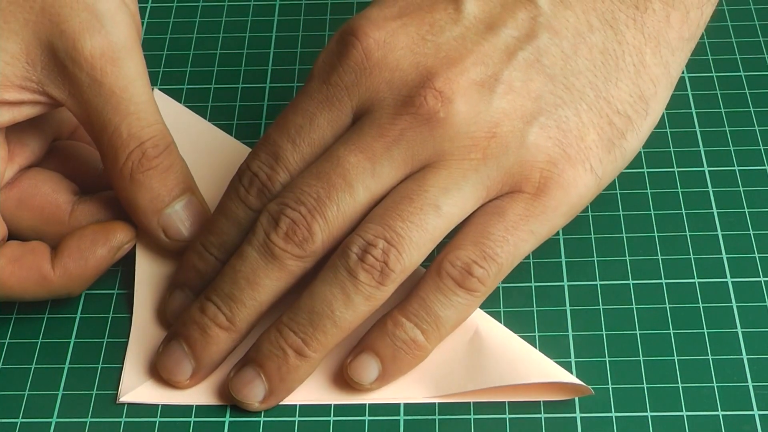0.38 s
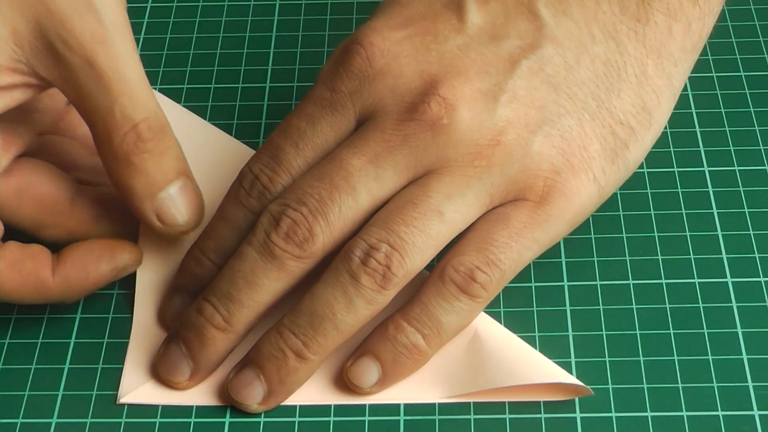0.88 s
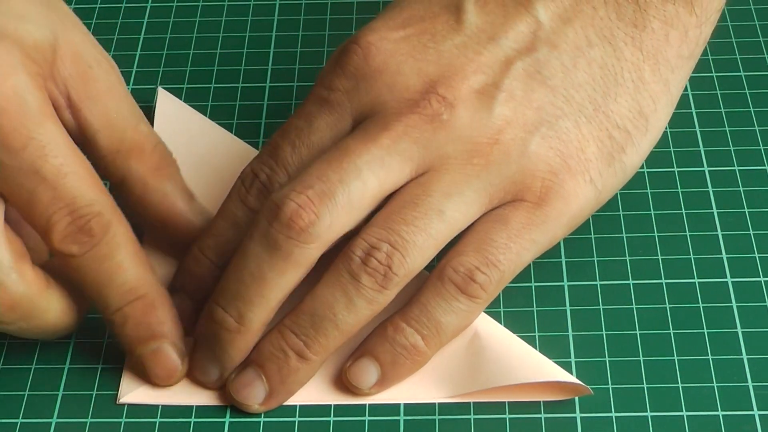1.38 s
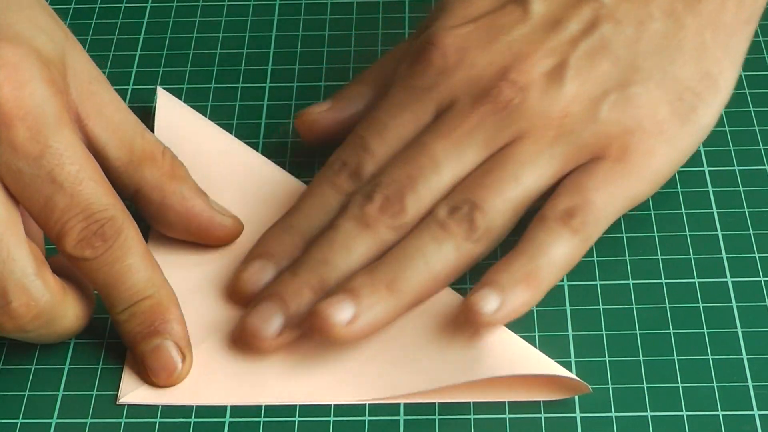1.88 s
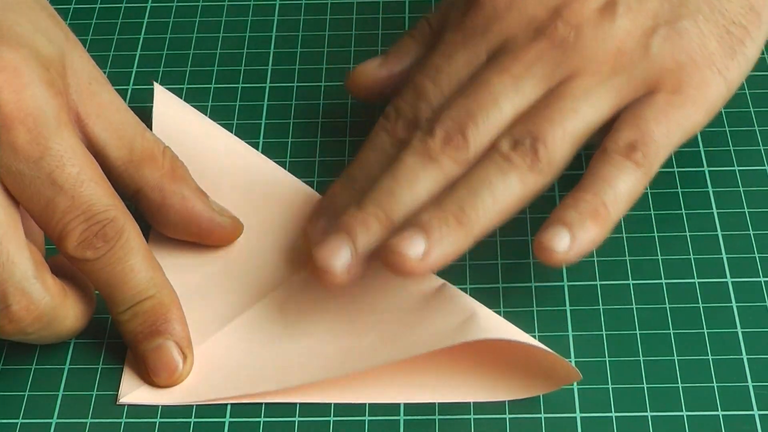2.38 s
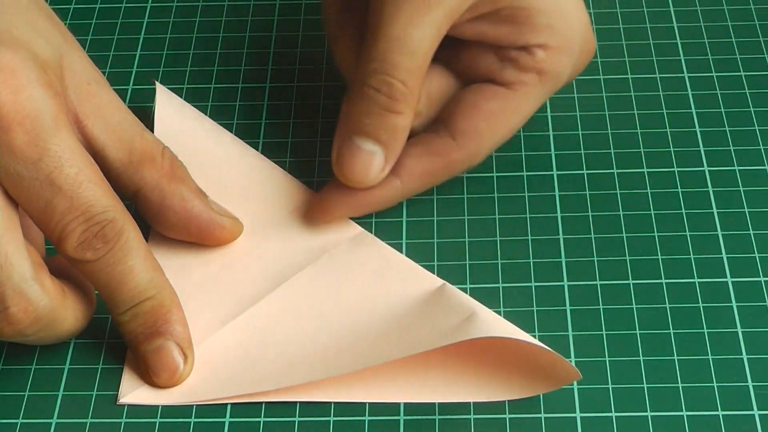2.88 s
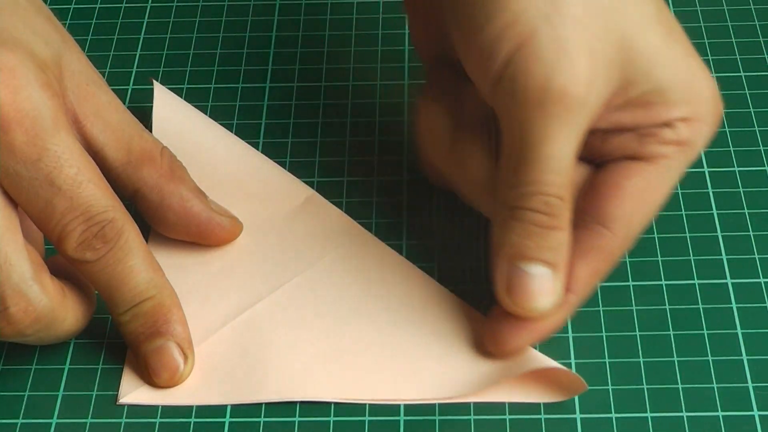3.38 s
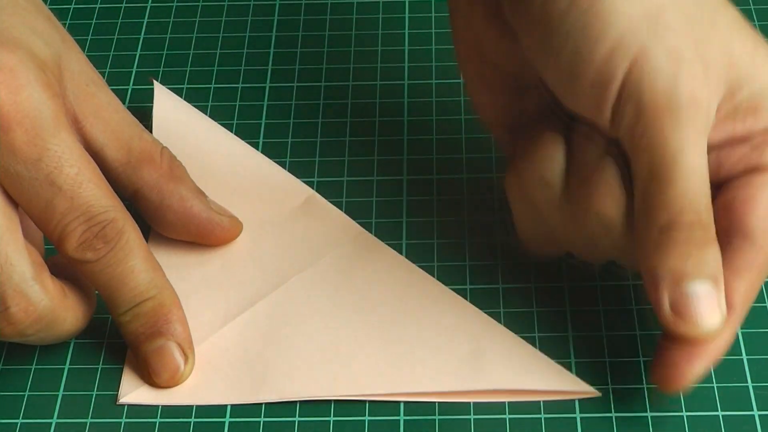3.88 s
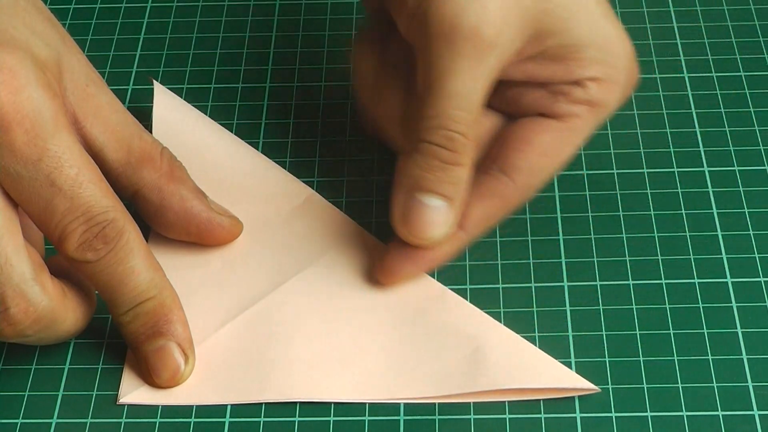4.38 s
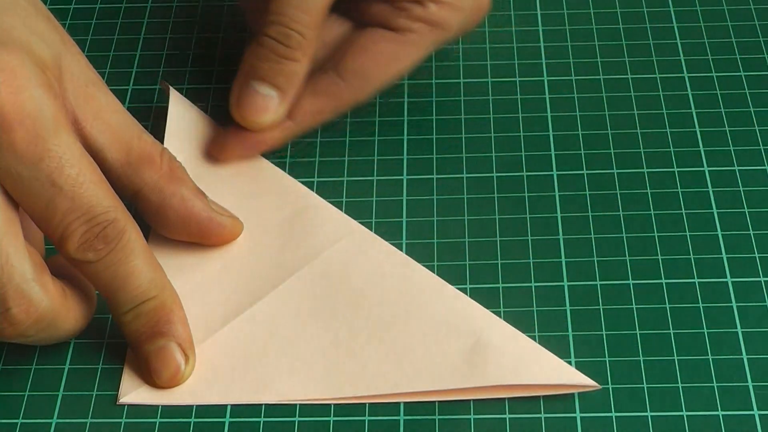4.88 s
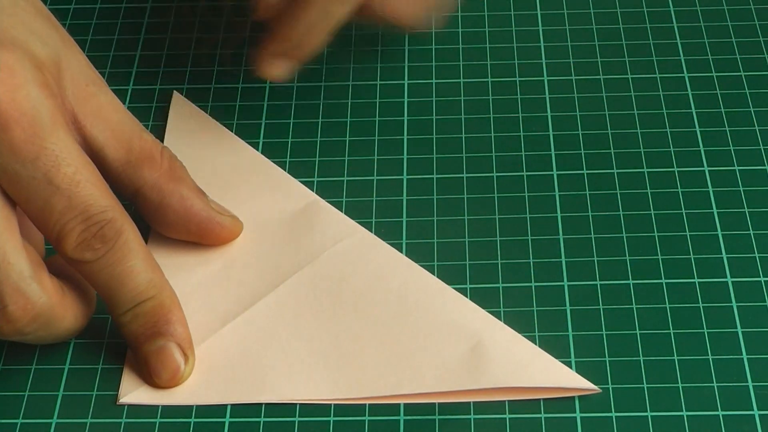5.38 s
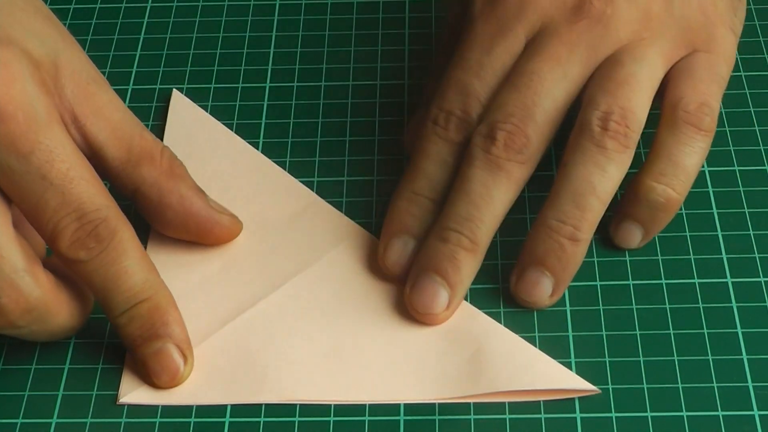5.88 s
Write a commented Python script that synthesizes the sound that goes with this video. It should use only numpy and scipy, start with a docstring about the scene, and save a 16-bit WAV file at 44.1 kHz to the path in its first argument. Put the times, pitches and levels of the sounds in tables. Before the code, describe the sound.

Fingers stroke a folded paper sheet on a cutting mat with dry airy swishes, sharp little crinkle snaps and soft taps in a quiet room.

```python
"""Fingers press and smooth a folded sheet of paper on a cutting mat in a quiet room.
From the start a fan-like room rumble of filtered noise and far traffic of wandering sines lie underneath.
Skin and nail hiss along the crease at once: grainy noise, coloured by the air pocket under the fold.
From 0.65 s the buckling sheet snaps: short bursts ring a crack, a sheet thump and a mat knock.
From 2.3 s the heel of the hand bumps the table twice, as short low sine hums."""
import sys
import numpy as np
from scipy import signal
from scipy.fft import rfft, irfft
from scipy.io import wavfile

SR = 44100
rng = np.random.default_rng(int(sys.argv[2]) if len(sys.argv) > 2 else 0)


def level_to_linear(level):
    """Convert decibel levels to linear amplitude factors, elementwise."""
    exponent = np.asarray(level, float) / 20
    return 10 ** exponent


def master_out(mix):
    """Clip the mix to full scale and print it as 16-bit PCM to the path in sys.argv[1]."""
    frames = np.transpose(np.atleast_2d(mix))
    ceiling = np.clip(frames, -1, 1)
    pcm = np.round(ceiling * 32767).astype(np.int16)
    wavfile.write(sys.argv[1], SR, pcm)


N = 264600   # 6 s

# how alike left and right are in the room sound: (frequency [Hz], likeness [clipped to 0..1])
ROOM_ALIKE = [(60, 0.91), (180, 1), (550, 0.18), (1650, -0.0087), (4970, -3.1), (15000, 0.051)]


def rms_one(x):
    """Scale to rms 1."""
    return x / np.sqrt(np.mean(x ** 2) + 1e-20)


def peak_one(x):
    """Scale to peak 1."""
    return x / np.abs(x).max()


def onset_one(x):
    """Scale to rms 1 over the first 8 ms."""
    return x / np.sqrt(np.mean(x[:, :SR // 125] ** 2))


def in_time(rows):
    """Columns of a table after its time column, one value per sample."""
    s, *columns = np.transpose(rows)
    return [np.interp(np.arange(N) / SR, s, column) for column in columns]


def at_hz(points, hz):
    """Read a spectrum on a log-frequency axis."""
    point_hz, values = np.transpose(points)
    return np.interp(np.log(hz), np.log(point_hz), values)


def panned(x, pan_db):
    """Share a sound between the two channels, the left pan_db above the right."""
    return x * np.array([level_to_linear(pan_db / 2), level_to_linear(-pan_db / 2)]).reshape(2, -1)


def drift(rate_hz):
    """Slow random wander of rms 1: noise through two equal poles at rate_hz."""
    hop, settle = 40, 2000   # samples per slow value, slow values dropped
    r = np.exp(-2 * np.pi * rate_hz * hop / SR)
    white = rng.standard_normal(N // hop + settle + 2)
    slow = signal.lfilter([1], [1, -2 * r, r * r], white)[settle:]
    return np.interp(np.arange(N) / hop, np.arange(len(slow)), rms_one(slow - slow.mean()))


def resonance(x, hz, width_hz):
    """Two-pole band-pass, gain about 1 on top."""
    r = np.exp(-np.pi * width_hz / SR)
    zeros = [(1 - r * r) / 2, 0, (r * r - 1) / 2]
    poles = [1, -2 * r * np.cos(2 * np.pi * hz / SR), r * r]
    return signal.lfilter(zeros, poles, x)


def rings(x, modes):
    """Resonances in parallel, signs alternating."""
    return sum(level_to_linear(db) * resonance(x, hz, width) * (-1) ** k for k, (hz, width, db) in enumerate(modes))


def stereo(pair, alike):
    """Left and right from two unrelated noises: one shared, one in opposite signs."""
    alike = np.clip(alike, 0, 1)
    shared = np.sqrt(1 + alike) * pair[0]
    opposed = np.sqrt(1 - alike) * pair[1] * [[1], [-1]]
    return (shared + opposed) / np.sqrt(2)


def bands(white, spectrum, likeness, count):
    """Stereo noise bands spanning a spectrum, each with its centre and at its level."""
    edges = np.geomspace(spectrum[0][0], min(spectrum[-1][0], .45 * SR), count + 1)
    for k, (low, high) in enumerate(zip(edges, edges[1:])):
        hz = np.sqrt(low * high)
        band_pass = signal.butter(2, [low, high], "band", fs=SR, output="sos")
        pair = signal.sosfilt(band_pass, white[k % 2])   # neighbours use different noise
        yield hz, level_to_linear(at_hz(spectrum, hz)) * stereo(pair, at_hz(likeness, hz))


def droning(hz, width_hz):
    """Noise twice through a narrow resonance, rms 1 before it is spread in stereo."""
    pair = resonance(rng.standard_normal((2, N + SR)), hz, width_hz)
    settled = resonance(pair, hz, 2 * width_hz)[:, SR:]
    return stereo(rms_one(settled), at_hz(ROOM_ALIKE, hz))


def room():
    """Broad room tone and recorder hiss, with narrow wavering resonances; two low ones swell with the rumble."""
    # colour of the room tone: (frequency [Hz], relative density [dB per Hz])
    tone_colour = [(20, -24), (45, -17), (70, -23), (100, -17), (160, -24.5), (260, -27), (500, -32.5),
                   (700, -31), (1150, -31.5), (1900, -45), (2800, -59), (5500, -42.5), (10000, -54),
                   (16000, -48.5)]
    # room resonances: (frequency [Hz], width [Hz], level [dB])
    drones = [(49.2, 10.6, -64), (118, 48, -64), (308.7, 53, -67.5), (637, 18, -73), (915, 68, -61)]
    # swelling of the rumble: (time [s], level [dB])
    swell = [(0.0, -62), (0.9, -60), (1.02, -57.5), (1.5, -53.5), (1.6, -57), (1.85, -56), (2.32, -53),
             (2.71, -58), (3.04, -53.5), (3.29, -55.5), (4.16, -56.5), (4.26, -54), (5.08, -55),
             (5.48, -58), (5.7, -56), (6.0, -63.5)]
    white = rng.standard_normal((2, 2, N))
    tone = sum(band for hz, band in bands(white, tone_colour, ROOM_ALIKE, count=19))
    swell_db, = in_time(swell)
    low_pair = (droning(186.3, 8.4) + level_to_linear(-0.36) * droning(223.5, 10.1)) / np.sqrt(2)
    steady = sum(level_to_linear(db) * droning(hz, width) for hz, width, db in drones)
    return level_to_linear(-55) * rms_one(tone) + level_to_linear(swell_db) * low_pair + steady


def traffic():
    """A deep sine throb that wanders in pitch and level, and a far engine's firing tone as a gliding sine."""
    # deep throb, before its random level wander: (time [s], level [dB])
    throb_course = [(0.0, -57), (0.2, -52.5), (1.1, -47.5), (1.27, -66), (1.34, -57), (1.72, -48),
                    (1.99, -54), (2.07, -51.5), (3.41, -53), (3.51, -68), (4.13, -51), (4.36, -64),
                    (4.5, -55.5), (5.16, -53.5), (5.3, -43.5), (6.0, -66)]
    # far engine, before its random level wander: (time [s], pitch [Hz], level [dB])
    engine_course = [(0, 118, -65), (1.9, 112, -62.5), (2.12, 108.8, -60.5), (2.3, 120, -50),
                     (2.55, 128, -54.5), (2.8, 130, -52.5), (3.1, 130, -63.5), (4.3, 128.6, -72),
                     (4.6, 129, -55), (5.2, 132, -65.5), (5.65, 133, -70), (5.8, 133, -52.5), (6, 132, -56)]
    throb_db, = in_time(throb_course)
    throb_hz = 28.7 + 5.3 / 2 * drift(2.62)
    throb = np.sin(np.cumsum(2 * np.pi * throb_hz / SR))
    throb = level_to_linear(throb_db + 3.4 * drift(3.4)) * throb
    engine_hz, engine_db = in_time(engine_course)
    engine = np.sin(np.cumsum(2 * np.pi * engine_hz / SR))
    engine = level_to_linear(engine_db) * engine * level_to_linear(2 * drift(4.4))
    return np.sqrt(2) * (panned(throb, 1.7) + engine)   # root 2 lifts each sine so that its rms equals the table's level


def hands():
    """Strokes and brushes add up in power; sharpness and pocket length lean to whatever hisses most."""
    # long finger strokes, one curve each of how hard the skin hisses: (time [s], level [dB])
    strokes = [
        [(.955, -56), (.99, -52.5), (1.05, -49), (1.135, -44.5), (1.155, -72), (1.2, -66)],
        [(1.35, -73.5), (1.385, -54), (1.42, -50), (1.46, -61.5), (1.5, -55.5), (1.545, -52), (1.57, -100)],
        [(1.62, -63), (1.68, -42.5), (1.8, -39.5), (1.9, -39.5), (2.0, -36), (2.075, -42), (2.095, -59),
         (2.14, -72)],
        [(2.845, -68), (2.865, -41), (2.895, -40.5), (2.915, -60), (2.94, -44.5)],
        [(2.94, -54), (2.98, -41.5), (3.02, -49), (3.06, -41.5), (3.18, -40.5), (3.25, -34), (3.33, -32.5),
         (3.42, -36.5), (3.5, -36.5), (3.56, -47), (3.62, -57.5), (3.74, -64.5)],
        [(4.13, -70), (4.16, -55), (4.25, -55.5), (4.36, -50.5), (4.55, -52), (4.68, -42.5), (4.78, -59)],
        [(4.6, -58), (4.69, -45), (4.76, -38), (4.85, -39), (4.95, -37), (5.03, -39), (5.08, -54.5),
         (5.15, -58.5), (5.24, -86)],
    ]
    # one row per stroke: (sheet flex level at full pressure [dB], fingertip sharpness [dB per octave],
    # pocket length [cm], time it starts to close [s], closing speed [cm per s])
    grips = [(-53, 0.5, 3.02, 1.2, 0.1), (-57.5, -4, 3.3, 2.4, 0.1), (-52.5, 4, 2.99, 1.62, 0.65),
             (-53.5, -0.5, 2.8, 2.5, 3), (-53.5, 4.5, 2.62, 3.3, 9), (-55.5, 7, 1.74, 4.1, 0.1),
             (-53.5, 1.3, 2.36, 4.77, 5.8)]
    # short brushes and scuffs: (peak time [s], time to fade by 10 dB [s], at least 3 ms is used,
    # hiss level [dB], sheet flex level [dB], sharpness [dB per octave])
    brushes = [(.02, -0.14, -60, -58, -1), (.2, -0.02, -66, -54, -3), (.67, 0.09, -64.5, -62, 3),
               (.725, 0.0462, -54, -54.5, 3), (.81, 0.04, -63.5, -64, 0), (.9, .02, -49.5, -53, 3.8),
               (.94, .03, -60, -56, -1.5), (1.126, 0.0225, -44.5, -39, -3.5), (1.283, 0.06, -55, -60, 12),
               (1.602, 0.0848, -52, -53.5, -3.5), (2.18, 0.03, -70, -60.5, -3),
               (2.32, 0.0336, -46.5, -54, 7), (2.359, 0, -60, -47, 1.5), (2.414, 0.01, -43.5, -46.5, 6),
               (2.45, .04, -64, -61, -11), (2.66, 0.15, -71.5, -83, 17), (3.62, 0.11, -60, -58.5, 4),
               (3.768, 0.06, -55.5, -56, 4), (3.858, 0.08, -62, -55, 4), (4.31, .028, -49.5, -64, 12),
               (4.66, 0.2, -52.5, -53.5, 20), (5.1, 0.11, -60, -56.5, 6), (5.2, .06, -78, -56, 3),
               (5.43, .022, -62, -74, 9), (5.49, 0.14, -69, -79, 7), (5.83, -0.09, -68, -59, 9)]
    flex_follows = 0.41   # share of the pressure's dB swing that the sheet flex follows
    open_pocket_cm, shut_pocket_cm = 2.96, 0.9
    sharp_per_cm = 2.7   # friction brightens as the pocket shuts [dB per octave for each cm]
    rise_share = 0.65   # a brush rises in this share of its fade time

    t = np.arange(0, N, 32) / SR
    silence_db = np.full(len(t), -90.0)
    touches = [(silence_db, silence_db, 5.0, open_pocket_cm)]
    for curve, (flex_db, sharp_db, pocket_cm, closes_s, cm_per_s) in zip(strokes, grips):
        s, db = np.transpose(curve)
        press_db = np.interp(t, s, db)
        off_db = -200 * ((t < s[0]) | (t > s[-1]))   # mute outside the stroke
        closed_cm = cm_per_s * np.maximum(t - closes_s, 0)
        length_cm = np.maximum(pocket_cm - closed_cm, shut_pocket_cm)
        bend_db = flex_db + flex_follows * (press_db - db.max())
        bright_db = sharp_db + sharp_per_cm * (pocket_cm - length_cm)
        touches.append((press_db + off_db, bend_db + off_db, bright_db, length_cm))
    for s, fade_s, hiss_db, flex_db, sharp_db in brushes:
        away_s = np.maximum(t - s, (s - t) / rise_share)
        shape_db = -10 * (away_s / max(fade_s, .003)) ** 2
        touches.append((hiss_db + shape_db, flex_db + shape_db, sharp_db, open_pocket_cm))

    hiss = sum(level_to_linear(2 * h) for h, f, sharp, cm in touches)   # doubled dB gives power
    flex = sum(level_to_linear(2 * f) for h, f, sharp, cm in touches)
    sharp_db = sum(level_to_linear(2 * h) * sharp for h, f, sharp, cm in touches) / hiss
    mean_cm = sum(level_to_linear(2 * h) * cm for h, f, sharp, cm in touches) / hiss
    pocket_hz = 34300 / 4 / mean_cm   # quarter-wave pipe, sound at 34300 cm per s
    return in_time(np.transpose([t, np.sqrt(hiss), np.sqrt(flex), sharp_db, pocket_hz]))


def rub():
    """Dense fibre slips hiss; the pocket under the fold lifts its own pitch and cuts what lies below."""
    # friction colour as the microphone hears it: (frequency [Hz], relative density [dB per Hz])
    hiss_colour = [(3100, -18.5), (3600, -9.5), (4600, -4), (5700, -3), (7000, -0.8), (8500, -1.5),
                   (10000, 1), (11500, -4.5), (13000, -1.5), (16000, -29)]
    # colour of the flexing sheet: (frequency [Hz], relative density [dB per Hz])
    flex_colour = [(300, 4.5), (600, 3.5), (900, 6), (1400, 8), (1800, 2.5), (2200, 0.5), (2700, -23)]
    # how alike left and right are: (frequency [Hz], likeness [0..1])
    rub_alike = [(300, 0.7), (1400, 0.85), (3100, 0.98), (6800, 0.85), (10000, 0.85), (15000, 0.19)]
    hiss_gain, flex_gain, sharp_db, pocket_hz = hands()
    grain = level_to_linear(1.47 * rng.exponential(1, N // 20 + 1)).repeat(20)[:N]   # uneven slips
    white = rng.standard_normal((2, 2, N)) * grain
    hiss, power = 0, 0
    for hz, band in bands(white, hiss_colour, rub_alike, count=15):
        u = (pocket_hz / hz) ** 2
        pocket = .15 + 1 / ((1 - u) ** 2 + u / 3.0)   # resonant high-pass twice, a little leaks past
        higher_modes_db = 2.2 * np.cos(2 * np.pi * (hz / pocket_hz - 1) / .65)
        gain = level_to_linear(sharp_db * np.log2(hz / 9000)) * pocket * level_to_linear(higher_modes_db)
        hiss = hiss + gain * level_to_linear(1.8 * drift(10)) * band
        power = power + gain ** 2 * np.mean(band ** 2)
    flex = sum(band * level_to_linear(1.5 * drift(12)) for hz, band in bands(white, flex_colour, rub_alike, count=7))
    return hiss_gain * hiss / np.sqrt(power) + flex_gain * rms_one(flex)


def nearby(x):
    """Hands, table and stand send short scattered echoes that ripple the spectrum finely."""
    count, span_s = 10, .012
    taps = np.zeros(round(span_s * SR) + 1)
    lags = np.sort(rng.uniform(.08, 1, count))   # shares of the span
    signs = rng.choice([-1, 1], count)
    taps[(lags * span_s * SR).astype(int)] = level_to_linear(-16 - 2.6 * lags) * signs   # later ones are weaker
    taps[0] = 1   # direct sound
    return signal.fftconvolve(x, taps[None] / np.sqrt(np.sum(taps ** 2)))[:, :N]


def snaps():
    """A crack, two quick bounces off the mat, then a crinkling tail; the sheet thumps and the mat knocks."""
    # paper snaps: (time [s], crack level [dB], sheet thump level [dB], thump pitch [Hz], mat knock level [dB])
    snap_list = [(0.6539, -42, -69, 965, -66), (0.7188, -30, -49.5, 1440, -67),
                 (0.851, -57, -51.5, 800, -52), (0.892, -28.5, -54.5, 1420, -49),
                 (0.971, -17.5, -35.5, 2180, -73), (1.2703, -27.5, -53, 740, -47),
                 (1.355, -47, -55, 917, -64), (1.3728, -39, -62, 875, -65), (1.5806, -37, -45, 835, -52.5),
                 (1.6187, -34, -44, 1180, -53), (2.145, -47, -36, 790, -60), (2.2677, -39, -97, 918, -75.5),
                 (2.3174, -25.5, -47, 605, -44.5), (2.3446, -19.5, -43.5, 1600, -40),
                 (2.3989, -41, -44.5, 710, -45.5), (2.4229, -15, -38.5, 1320, -42),
                 (2.6053, -49, -65, 890, -72), (2.64, -49, -73, 910, -73), (2.6755, -48, -68, 886, -73),
                 (2.723, -46, -87, 934, -62), (2.7561, -56, -91, 689, -69), (2.824, -23, -36, 824, -43.5),
                 (2.9258, -26, -51, 990, -58), (2.9498, -6, -30.5, 1324, -40.5),
                 (3.1454, -8.5, -29, 1175, -32.5), (3.252, -20, -49, 970, -57),
                 (3.4058, -28, -40, 1610, -53), (3.7962, -38, -63, 896, -66), (4.135, -29, -53, 1560, -61),
                 (5.8114, -37.5, -54.5, 793, -61), (5.8463, -41.5, -60, 925, -57)]
    # treble ringing of a snap, before crispness: (frequency [Hz], width [Hz], relative level [dB])
    crack_modes = [(3600, 800, -9), (5300, 2400, -7), (8800, 2000, 0), (12500, 4500, -10)]
    # sheet ringing besides a snap's own thump: (frequency [Hz], width [Hz], relative level [dB])
    sheet_modes = [(765, 560, -6.5), (1310, 307, 2), (2126, 177, -1.5)]
    # mat ringing: (frequency [Hz], width [Hz], relative level [dB])
    mat_modes = [(206, 167, -4), (353, 120, 2), (413, 244, -3.5), (562, 170, -2)]
    tail_t60_s = 0.069
    out, t = np.zeros((2, N)), np.arange(SR // 6) / SR
    soft = signal.butter(2, 3200, fs=SR, output="sos")
    for s, crack_db, thump_db, thump_hz, knock_db in snap_list:
        crisp_db = -0.3 - 0.19 * (thump_db + 50)   # dB per octave: the weaker the thump, the crisper
        noise, lags = rng.standard_normal((2, len(t))), rng.uniform(.9, 1.1, 2)
        burst = 0.077 * noise * level_to_linear(-60 * t / tail_t60_s)
        hits = [0, round(.0009 * lags[0] * SR), round(.0021 * lags[1] * SR)]   # crack and two bounces
        burst[:, hits] += [1, -.45, .25]
        tilted = [(hz, width, db + crisp_db * np.log2(hz / 8000)) for hz, width, db in crack_modes]
        crack = rings(burst, tilted)
        dull = signal.sosfilt(soft, burst)
        thump = level_to_linear(5.5) * resonance(dull, thump_hz, 123) + rings(dull, sheet_modes)
        knock = rings(dull, mat_modes)
        both = level_to_linear(crack_db) * peak_one(crack) + level_to_linear(thump_db) * onset_one(thump)
        both += level_to_linear(knock_db) * onset_one(knock)
        alike = both[0] + 0.17 * (both[1] - both[0]) * [[1], [-1]]   # tails differ a little at the two ports
        at = round(s * SR)
        out[:, at:at + len(t)] += alike[:, :N - at]
    return out


def bumps():
    """A soft push makes the table top hum briefly: a low sine of ten to twenty swings under a rounded swell."""
    # heel of the hand settling on the table: (time [s], level [dB], pitch [Hz], length [s])
    pushes = [(2.855, -38, 112, .1), (2.33, -40, 232, .08)]
    out, t = 0, np.arange(N) / SR
    for s, db, hz, length in pushes:
        u = np.clip((t - s) / length, 0, 1)
        out = out + level_to_linear(db) * np.sin(np.pi * u) ** 2 * np.sin(2 * np.pi * hz * (t - s))
    return out


def scene():
    """All sources at the microphone; only the rubbing gets the short echoes."""
    return room() + traffic() + nearby(rub()) + snaps() + bumps()


def band_limit(x):
    """A steep low-pass at the top of the band."""
    return signal.sosfilt(signal.butter(12, 16960, fs=SR, output="sos"), x)


def record(dry):
    """The two microphone ports differ in level and phase with frequency; the top rolls off steeply."""
    # level difference of the ports: (frequency [Hz], left minus right [dB])
    port_balance = [(60, 1), (400, 1.5), (950, 1.5), (2400, 1), (5000, -1.5), (8500, -1), (11000, -5.5),
                    (13000, -0.2), (15000, 5)]
    # phase difference of the ports: (frequency [Hz], lead of the left [rad])
    port_phase = [(300, -0.25), (1500, -0.02), (4200, 0.1), (10700, -0.49), (11800, 1.81), (12700, 2.51),
                  (13800, 1.11), (15800, 0.31)]
    hz = np.maximum(np.fft.rfftfreq(N, 1 / SR), 1)
    half = level_to_linear(at_hz(port_balance, hz) / 2) * np.exp(.5j * at_hz(port_phase, hz))
    top = 1 / np.sqrt(1 + (hz / 16000) ** 40)
    mix = irfft(rfft(dry) * top * [half, 1 / half], N)   # each port takes half the difference
    return band_limit(mix)


dry = scene()
out = record(dry)
master_out(out)
```